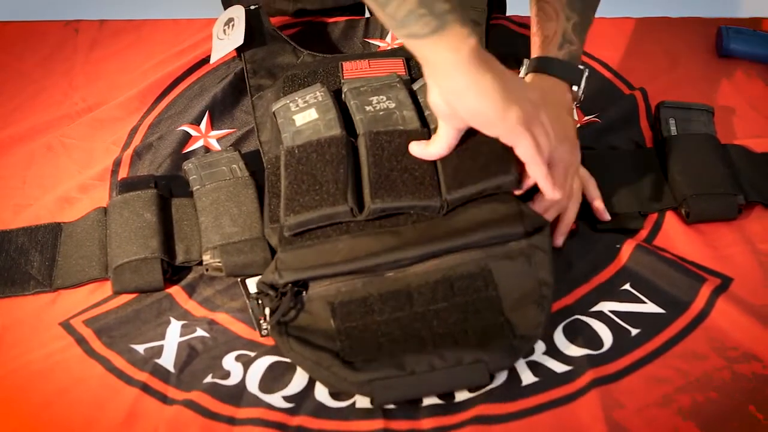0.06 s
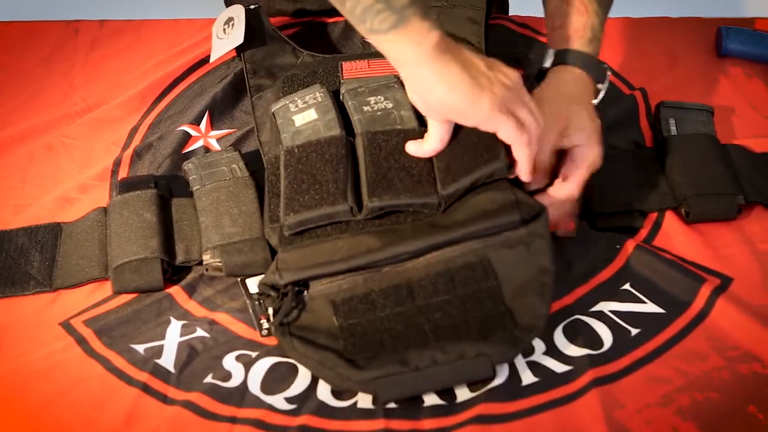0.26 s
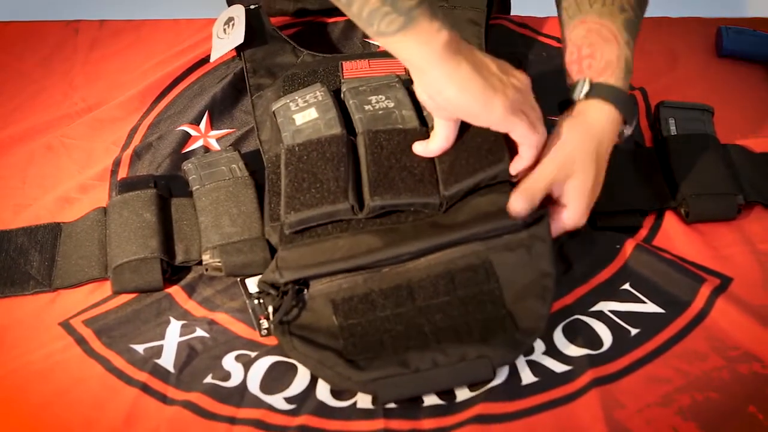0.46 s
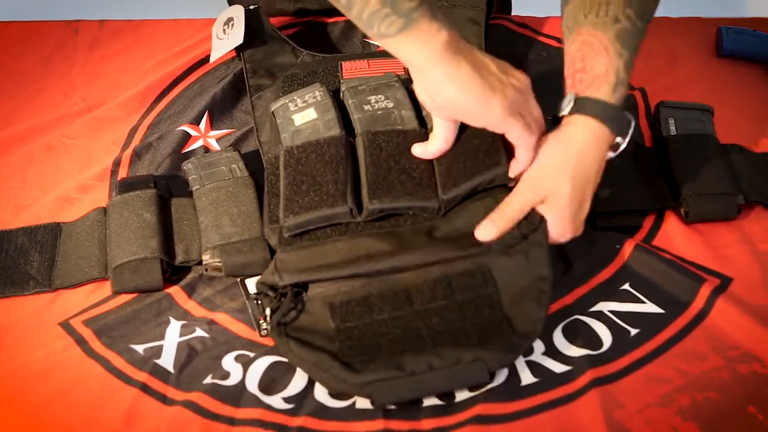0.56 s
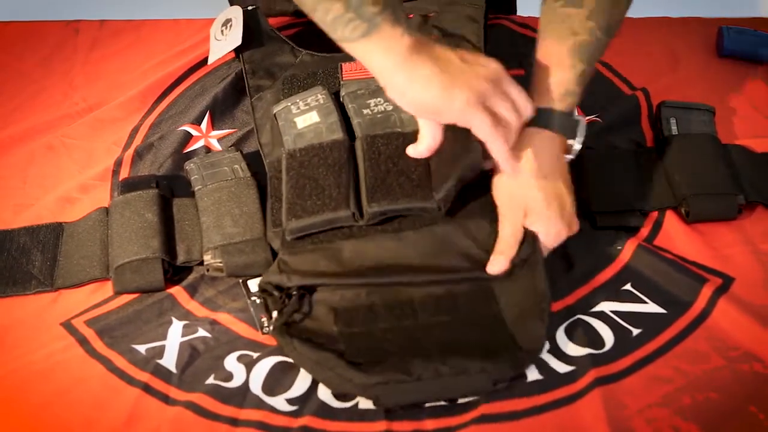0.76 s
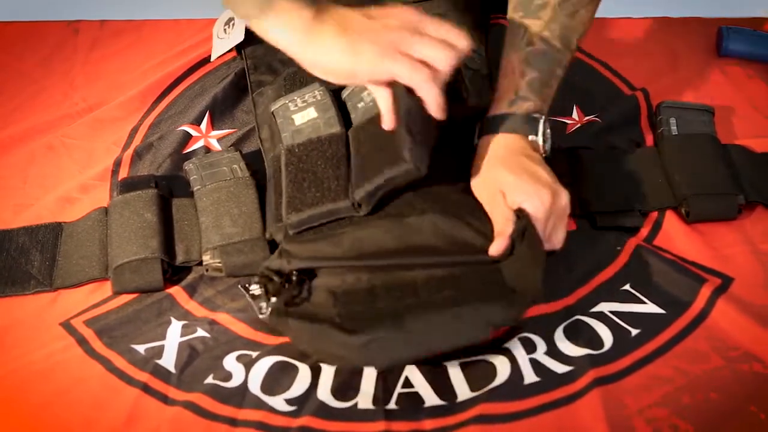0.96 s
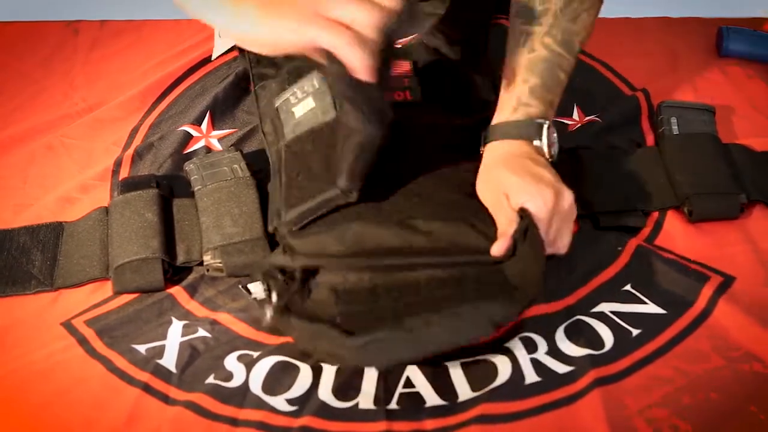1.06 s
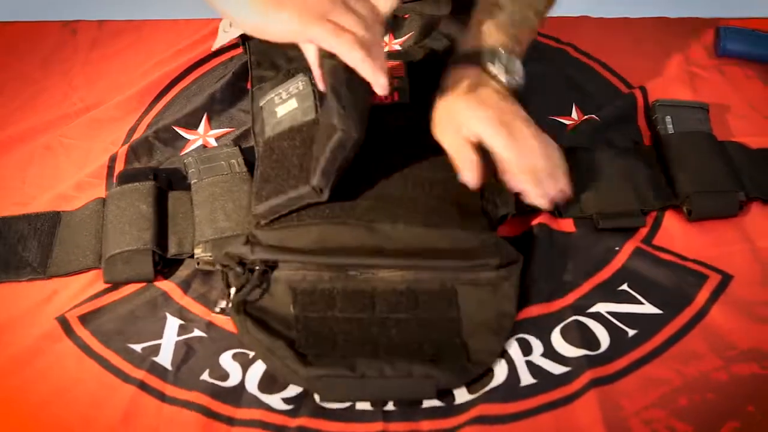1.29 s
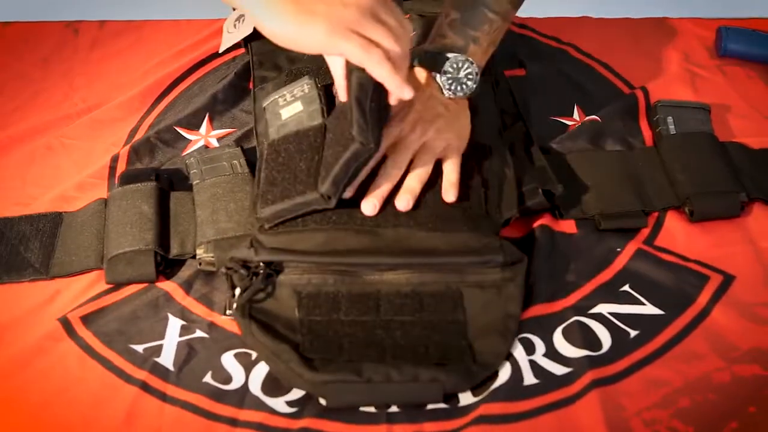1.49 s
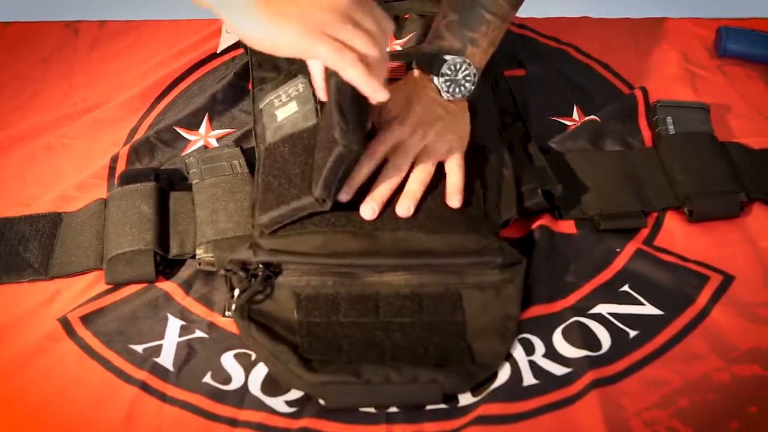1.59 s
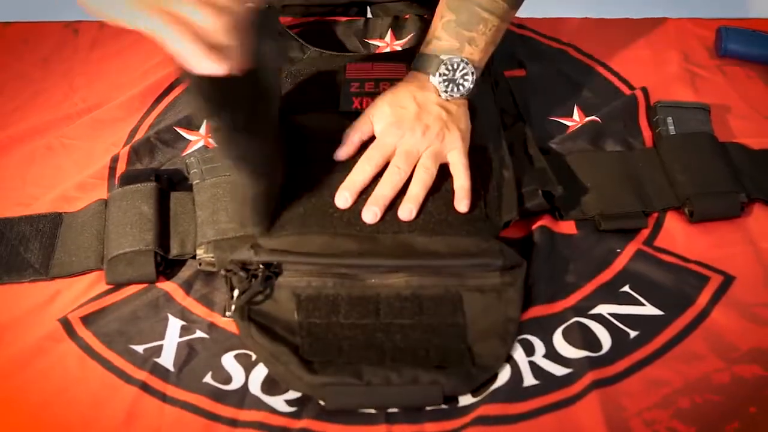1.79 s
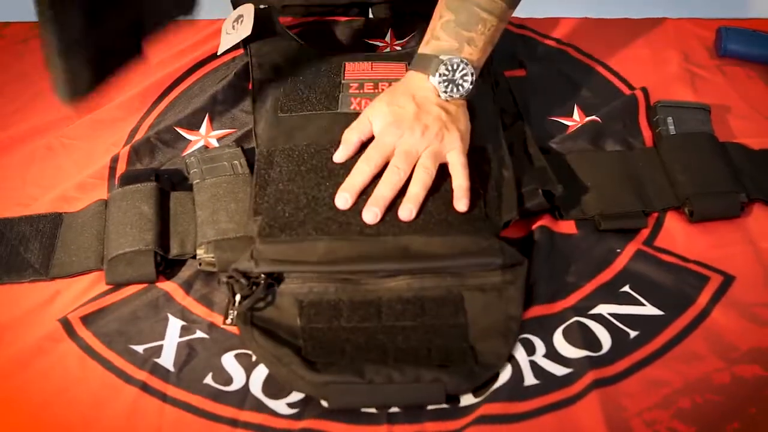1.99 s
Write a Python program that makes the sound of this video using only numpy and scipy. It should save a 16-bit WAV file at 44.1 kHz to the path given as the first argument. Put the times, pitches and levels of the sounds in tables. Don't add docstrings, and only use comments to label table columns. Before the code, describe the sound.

Hook-and-loop fastener ripped apart in three crackling pulls, with soft thumps and a pouch knock

```python
import sys
import numpy as np
from scipy import signal
from scipy.fft import rfft, irfft
from scipy.io import wavfile

SR = 44100
rng = np.random.default_rng(int(sys.argv[2]) if len(sys.argv) > 2 else 0)


def magnitude_from_level(level_db):
    exponent = np.asarray(level_db, float) / 20
    return 10 ** exponent


def inscribe(sig):
    pcm = np.round(np.clip(np.atleast_2d(sig).T, -1, 1) * 32767)
    wavfile.write(sys.argv[1], SR, pcm.astype(np.int16))


N = 89919


def rms_one(x):
    return x / np.sqrt(np.mean(x ** 2) + 1e-20)


def at_hz(points, hz):
    table_hz, value = np.transpose(points)
    return np.interp(np.log(hz), np.log(table_hz), value)


def level_curve(points):
    s, db = np.transpose(points)
    return magnitude_from_level(np.interp(np.arange(N) / SR, s, db, -150, -150))


def drift(rate_hz):
    r = np.exp(-2 * np.pi * rate_hz / SR)
    noise = rng.standard_normal(N + 8000)
    return rms_one(signal.lfilter([1], [1, -2 * r, r * r], noise)[8000:])


def ring(clicks, hz, t60_s):
    r = magnitude_from_level(-60 / (t60_s * SR))
    w = 2 * np.pi * hz / SR
    return signal.lfilter([0, np.sin(w)], [1, -2 * r * np.cos(w), r * r], clicks + 1e-18)


def butter(x, order, hz, kind):
    return signal.sosfilt(signal.butter(order, hz, kind, fs=SR, output="sos"), x)


def coloured(x, spectrum):
    hz = np.maximum(np.arange(N // 2 + 1) * SR / N, 10)
    return irfft(rfft(x) * magnitude_from_level(at_hz(spectrum, hz)), N)


def puffs(s, db, length_s):
    out, age_s = np.zeros(N + SR), np.arange(2000) / SR
    grain = rng.standard_normal((len(s), len(age_s)))
    for k, i in enumerate((np.asarray(s) * SR).astype(int)):
        decay = np.exp(-age_s / max(length_s[k], 2e-4))
        out[i:i + len(age_s)] += magnitude_from_level(db[k]) * grain[k] * decay
    return out[:N]


def struck(events, modes, spread_db):
    s, db = np.transpose(events)
    chance = rng.standard_normal((len(s), len(modes)))
    out = 0
    for k, (hz, level_db, t60_s) in enumerate(modes):
        clicks = np.zeros(N)
        clicks[(s * SR).astype(int)] = magnitude_from_level(db + level_db + spread_db * chance[:, k])
        out = out + ring(clicks, hz, t60_s)
    return out


def tearing():
    # time_s, level_db, backing_fullness_db, hook_tautness_db, free_flap_hz
    pull_1 = [(0, -39.5, 0, -6.5, 1480), (.075, -49.5, 5, 9, 1490), (.1, -33, -4.5, 2.5, 1340),
              (.14, -27, 6.5, -1, 1510), (.165, -38, -1, -5.5, 3240), (.21, -29.5, 0.5, -5.5, 3380),
              (.248, -15.5, -3.5, -18.5, 3530), (.285, -24, -15.5, -4, 3280), (.33, -54, -20, 5, 3300)]
    pull_2 = [(.67, -55.5, 6, 7.5, 2500), (.705, -40, 1, -17.5, 2750), (.725, -23, -9.5, -6, 2770),
              (0.798, -24, -9, -6.5, 3200), (0.806, -14, -16.5, -6.5, 2860),
              (0.876, -11.5, -17.5, -7, 3080), (0.931, -16.5, 6.5, -4.5, 3200),
              (0.988, -17, -1.5, -5.5, 3040), (1.029, -18, 11.5, 6.5, 3030)]
    pull_2_end = [(1.03, -25, 0, 20, 3400), (1.065, -10, -2, -7.5, 3700), (1.111, -12, 3, -5.5, 4000),
                  (1.142, -17, 9.5, -1, 3700), (1.166, -31.5, 24, 6, 3000), (1.2, -27, 9, 8.5, 2720),
                  (1.246, -30, -11, 1.5, 2780), (1.256, -37.5, 12, -10, 3000),
                  (1.332, -38.5, 14, -4.5, 3000)]
    pull_3 = [(1.701, -75, -8.5, 4, 3340), (1.731, -39, -31, 1, 3260), (1.772, -32, -24, -2.5, 2940),
              (1.787, -24.5, -9.5, 8.5, 2820), (1.83, -21.5, 12, 9.5, 2770), (1.922, -24.5, 15, 21, 3600),
              (1.961, -14, -12, -3.5, 3020), (1.967, -42, 6, -12.5, 3010), (2.03, -55, -15, -2, 3000)]
    # start_s, peak_db, dullness_0_to_1
    snaps = [(0.005, -23.5, 0.2), (0.017, -15, 0.4), (0.042, -18, 0.34), (0.062, -42.5, 0),
             (0.083, -20.5, 0.5), (0.086, -16.5, 0.6), (0.095, -23, 0.3), (0.094, -15.5, 0),
             (0.111, -12.5, 0.5), (0.121, -23, 0.8), (0.124, -17.5, 0), (0.136, -30.5, 0),
             (0.152, -12.5, 0.32), (0.166, -25.5, 0), (0.187, -23, 0.7), (0.198, -10.5, 0.2),
             (0.202, -12, 0.45), (0.207, -15.5, 0.1), (0.225, -2, 0.3), (0.235, -7.5, 0), (0.239, 2.5, 0.4),
             (0.245, -6, 0.18), (0.256, -7.5, 0.9), (0.268, -7, 0.3), (0.283, -9.5, 0.6),
             (0.294, -19.5, 0.3), (0.683, -37, 0.4), (0.708, -17, 0.6), (0.716, -22, 0.6),
             (0.725, -15.5, 0.6), (0.752, -11.5, 0.4), (0.758, -10.5, 0.4), (0.765, -17, 0.4),
             (0.789, -11.5, 0.2), (0.798, -12.5, 0.3), (0.803, -2.5, 1), (0.825, -1, 0.4), (0.829, 1, 0.5),
             (0.844, 0, 0.5), (0.853, -7.5, 0.1), (0.871, 1, 0), (0.88, 6, 0.5), (0.9, -4, 0.6),
             (0.932, 0, 0.25),
             (1.059, 0.5, 0.5), (1.079, -3.5, 0.7), (1.087, 2, 0.5), (1.095, 4, 0.68),
                  (1.112, 1.5, 0.04), (1.115, -1.5, 0.4), (1.129, -0.5, 0.26), (1.141, -14.5, 0.7),
                  (1.203, -9.5, 0.5), (1.22, -15, 0.3), (1.241, -11.5, 0.5), (1.713, -34, 0.2),
                  (1.72, -31.5, 0.5), (1.731, -21.5, 0), (1.743, -25.5, 0.4), (1.75, -28.5, 0.7),
                  (1.755, -19, 0.5), (1.761, -25.5, 0.1), (1.766, -11, 0.4), (1.774, -9.5, 0.3),
                  (1.79, -9.5, 0.6), (1.845, -6.5, 0.63), (1.916, -9, 0.27), (1.93, -9.5, 0.4),
                  (1.955, -4.5, 0.1)]
    # freq_hz, level_db
    backing = [(200, -30), (300, -23), (570, -2.5), (1000, -3.5), (2000, -5.5), (4500, -6), (7400, -10.5),
               (16000, -45)]
    # time_s, level_db
    palm = [
        (1.6, -1.5),
        (1.7, 16),
        (1.77, 13.5),
        (1.81, 11),
        (1.86, -1),
        (1.94, -2.5),
        (1.96, 13.5),
        (2.03, 2),
    ]
    hooks_per_s, hook_spread_db, hook_cycles = 4000, 3.0, 12.0
    clump_db, own_clump_db, clumps_hz = 0.82, 1.07, 120
    snap_s, snap_db, crack_db, snap_lag_s = 0.0014, -7.5, 19, .0008
    dull_db_per_octave, long_flap_db_per_octave = 10, 4
    full_below_hz, taut_above_hz = 803, 6070
    peel_db, peel_octaves = 10.5, .25
    panel_hz, panel_octaves = 1100, .3

    t = np.arange(N) / SR
    pulls = (pull_1, pull_2, pull_2_end, pull_3)
    force = sum(level_curve(np.array(p)[:, :2]) for p in pulls)
    s, _, full, taut, peel_hz = np.concatenate(pulls).T
    full, taut, peel_hz = (np.interp(t, s, column) for column in (full, taut, peel_hz))
    palm_db = np.interp(t, *np.transpose(palm))
    flap_db = peel_db + long_flap_db_per_octave * np.log2(3000 / peel_hz)

    snap_at_s, db, dull = np.transpose(sorted(snaps))
    snap_at_s = snap_at_s + snap_lag_s
    crack = np.zeros(N)
    crack[(snap_at_s * SR).astype(int) + 1] = magnitude_from_level(db + snap_db + crack_db)
    last = np.clip(np.searchsorted(snap_at_s, t) - 1, 0, None)
    crackle = magnitude_from_level(db[last] + snap_db) * np.exp(-np.abs(t - snap_at_s[last]) / snap_s)
    crackle = crackle * (t >= snap_at_s[0])

    together = clump_db * drift(clumps_hz)
    own = [own_clump_db * drift(clumps_hz) for _ in range(4)]
    out, power = 0, 0
    for k, hz in enumerate(np.geomspace(300, 15500, 32)):
        swell = magnitude_from_level(together + own[k // 4 % 4])
        sizes = magnitude_from_level(hook_spread_db * np.minimum(rng.exponential(1, N), 4)) * rng.choice([-1, 1], N)
        lets_go = rng.random(N) < hooks_per_s * swell * np.sqrt(hz / 3000) / 5 / SR
        hooks = rms_one(sizes * lets_go * swell)

        row = crackle * rng.choice([-1, 1], N) + crack * (-1) ** k
        row = row * magnitude_from_level(-dull_db_per_octave * (dull[last] - 0.3) * np.log2(hz / 2000))

        shade_db = full / (1 + (hz / full_below_hz) ** 2) + taut / (1 + (taut_above_hz / hz) ** 2)
        shade_db = shade_db + flap_db * np.exp(-(np.log2(hz / peel_hz) / peel_octaves) ** 2)
        shade_db = shade_db + palm_db * np.exp(-(np.log2(hz / panel_hz) / panel_octaves) ** 2)

        t60_s = hook_cycles / hz
        ring_norm = np.sqrt(np.sum(ring(t[:SR] == 0, hz, t60_s) ** 2))
        gain = np.sqrt(hz) * magnitude_from_level(at_hz(backing, hz))
        out = out + ring((force * hooks + row) * magnitude_from_level(shade_db), hz, t60_s) / ring_norm * gain
        power = power + gain ** 2
    return magnitude_from_level(-1.99) * butter(out, 4, 330, "high") / np.sqrt(power)


def vest_thumps():
    # start_s, peak_db
    thumps = [(.115, -60), (.24, -55), (.365, -53), (.9, -33.5), (.928, -30.5), (.95, -63), (.97, -52),
              (1.2, -45), (1.235, -47), (1.262, -30), (1.295, -34), (1.328, -32), (1.345, -47),
              (1.415, -76), (1.53, -50), (1.595, -41), (1.612, -55), (1.632, -39.5), (1.682, -55.5),
              (1.8, -49), (1.85, -69), (1.9, -41.5), (1.99, -57)]
    # freq_hz, level_db, t60_s
    table_top = [(128.3, 1.5, 0.09), (160, -17, 0.13), (187, -5.5, 0.13), (295, -5.5, .1)]
    return butter(struck(thumps, table_top, spread_db=2.5), 4, 230, "low")


def pouch_knocks():
    # start_s, peak_db
    knocks = [
        (1.385, -13),
        (1.571, -33.5),
    ]
    # freq_hz, level_db, t60_s
    pouch = [(403, -6, 0.05), (474, -10, 0.04), (530, 1, .08), (585, -3, 0.06), (670, -9, 0.07),
             (800, -1, .07), (865, 0, 0.045), (925, -3, 0.09), (1030, -4, 0.05)]
    s, db = np.transpose(knocks)
    rattle = puffs(s, db - 39.5, s * 0 + 0.012)
    knock = struck(knocks, pouch, spread_db=1) * magnitude_from_level(-20)
    knock = knock + sum(magnitude_from_level(level_db) * ring(rattle, hz, t60_s) for hz, level_db, t60_s in pouch)
    crack = puffs(s, db - 12, s * 0 + .018)
    return butter(crack, 4, [1200, 4500], "band") + butter(knock, 4, [360, 1250], "band")


def hands():
    # start_s, peak_db, length_s
    ticks = [
        (1.49, -44, 0.0084),
        (1.547, -43.5, 0.0035),
        (1.568, -44.5, 0.0034),
        (1.577, -43, 0.0024),
        (1.592, -44.5, 0.0016),
        (1.63, -39, 0.00049),
    ]
    # time_s, level_db
    brush = [
        (.56, -82),
        (.62, -64.5),
        (.67, -72),
        (.7, -81),
        (1.42, -71),
        (1.489, -54),
        (1.53, -66),
        (1.575, -55.5),
        (1.621, -72),
        (1.7, -78),
    ]
    weave_hz, weave_width_hz, air_db = 3200, 1700, -11
    s, db, length_s = np.transpose(ticks)
    rub = level_curve(brush) * magnitude_from_level(1.8 * drift(60)) * rng.standard_normal(N)
    raw = puffs(s, db, length_s) + rub
    return ring(raw, weave_hz, 2.1 / weave_width_hz) + magnitude_from_level(air_db) * np.diff(raw, prepend=0)


def room(x):
    # freq_hz, t60_s
    room_t60 = [(150, 0.56), (500, 0.32), (1500, 0.43), (3500, 0.45), (7000, 0.37), (14000, 0.22)]
    level_db, gap_s = -8, 0.0045
    age_s = np.arange(SR) / SR
    edges_hz = 70 * 2 ** np.arange(0, 8.1, .5)
    white = rng.standard_normal((2, SR))
    tail = 0
    for k, (low, high) in enumerate(zip(edges_hz, edges_hz[1:])):
        band = butter(white[k % 2], 2, [low, high], "band")
        tail = tail + band * magnitude_from_level(-60 * age_s / at_hz(room_t60, np.sqrt(low * high)))
    tail = tail * np.clip(age_s / gap_s - 1, 0, 1)
    return magnitude_from_level(level_db) * signal.fftconvolve(x, tail / np.sqrt(np.sum(tail ** 2)))[:N]


def background():
    # freq_hz, level_db
    tone_spectrum = [(24, -76), (40, -38), (147, -13), (220, -14), (444, -15), (1150, -30.5), (1340, -19),
                     (1810, -29), (16000, -43)]
    # freq_hz, rms_db
    hum_partials = [(120, -75), (235, -64.5), (346, -72)]
    out = magnitude_from_level(-61) * rms_one(coloured(rng.standard_normal(N), tone_spectrum))
    for hz, db in hum_partials:
        sine = np.sqrt(2) * np.sin(2 * np.pi * hz * np.arange(N) / SR)
        out = out + magnitude_from_level(db + 0.53 * drift(6.5)) * sine
    return out


def scene():
    near = tearing() + hands()
    below = vest_thumps() + pouch_knocks()
    echo = room(near + .55 * below)
    return (near + below + echo + background())[None]


def top_cut(x):
    return signal.sosfilt(signal.butter(12, 16050, fs=SR, output="sos"), x)


def record(dry):
    top, knee = .88, 2.5
    rounded = top * np.tanh((np.abs(dry) / top) ** knee) ** (1 / knee) * np.sign(dry)
    mix = butter(rounded, 6, 115, "high")
    return top_cut(mix)


dry = scene()
out = record(dry)
inscribe(out)
```